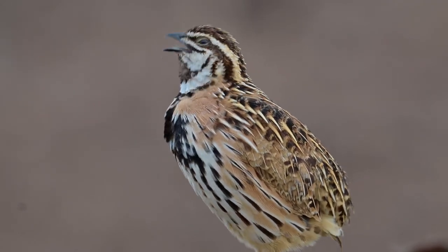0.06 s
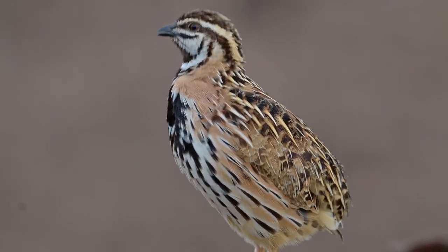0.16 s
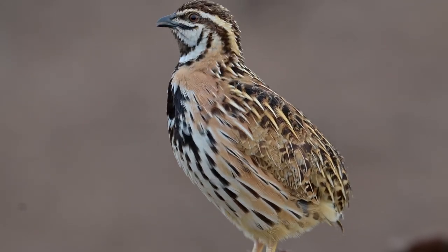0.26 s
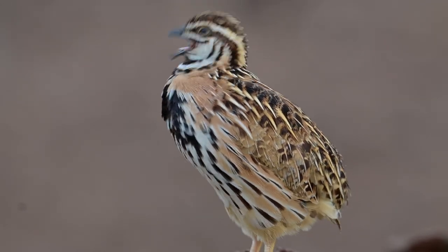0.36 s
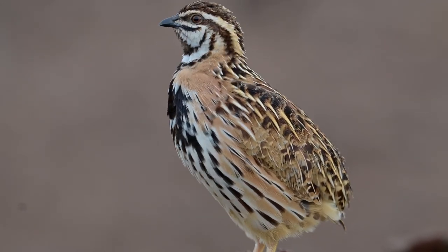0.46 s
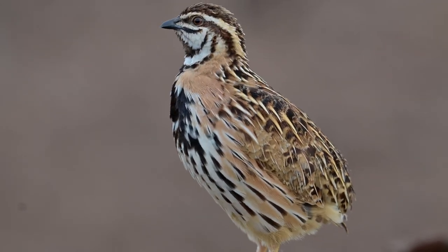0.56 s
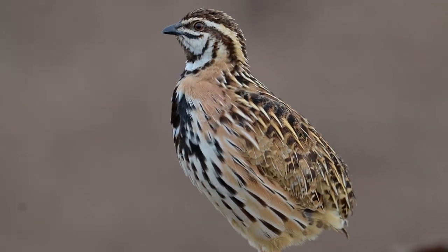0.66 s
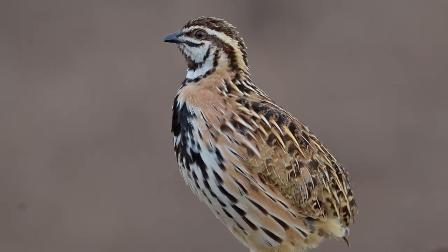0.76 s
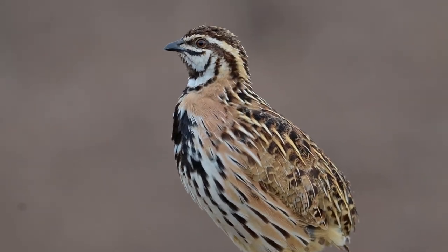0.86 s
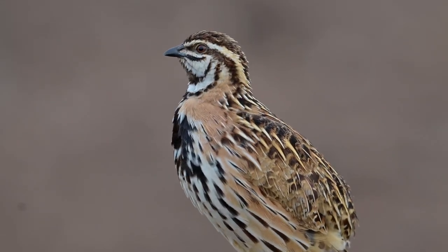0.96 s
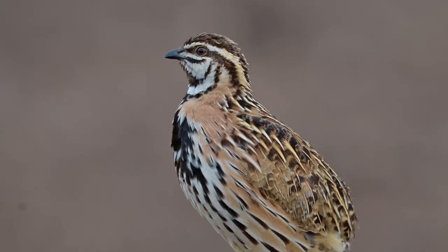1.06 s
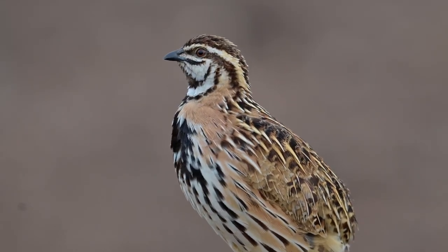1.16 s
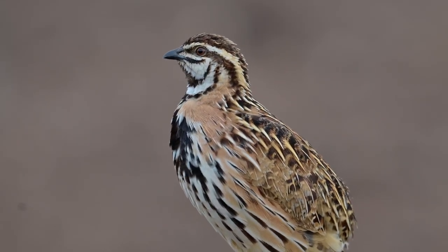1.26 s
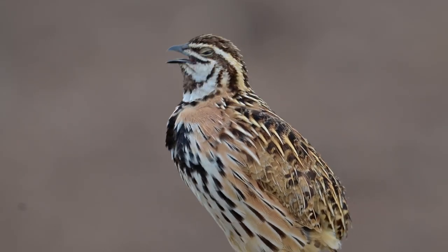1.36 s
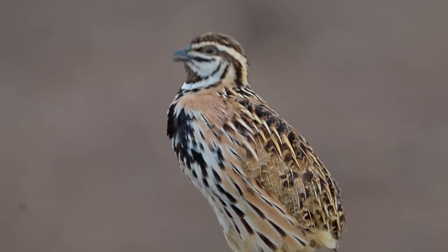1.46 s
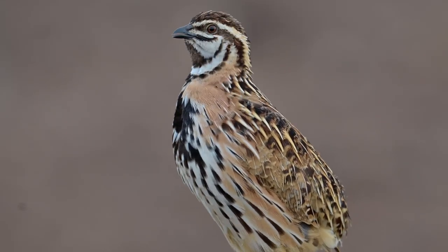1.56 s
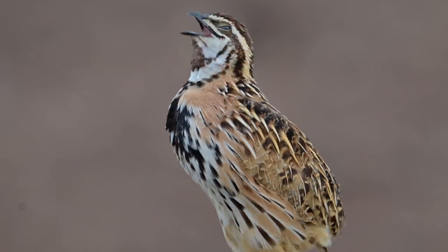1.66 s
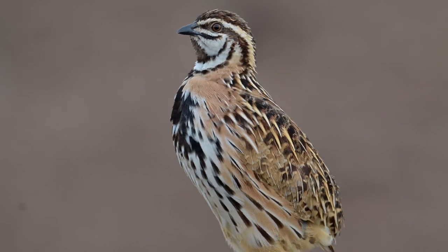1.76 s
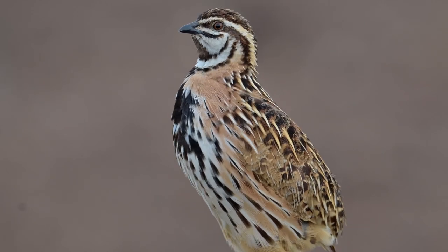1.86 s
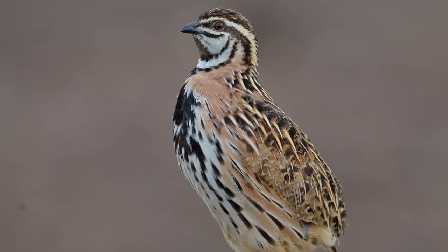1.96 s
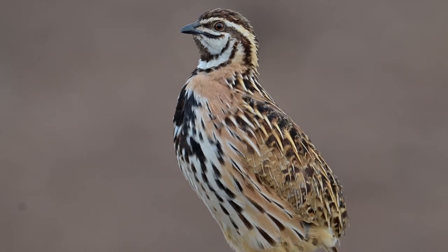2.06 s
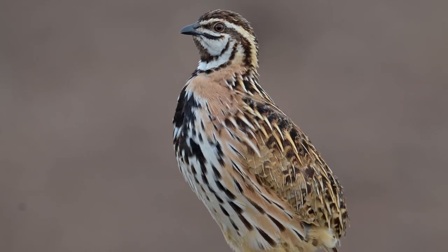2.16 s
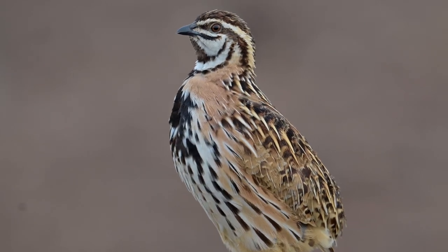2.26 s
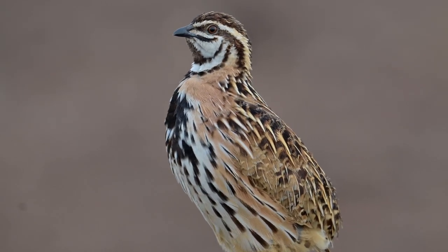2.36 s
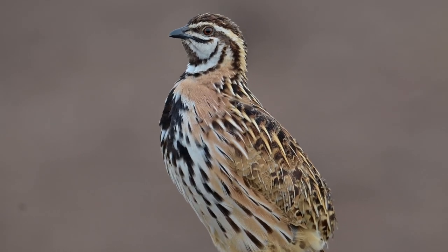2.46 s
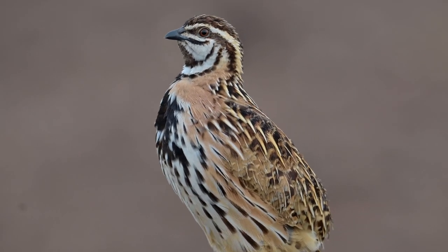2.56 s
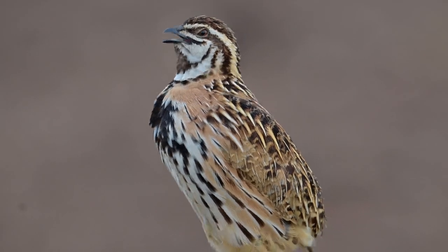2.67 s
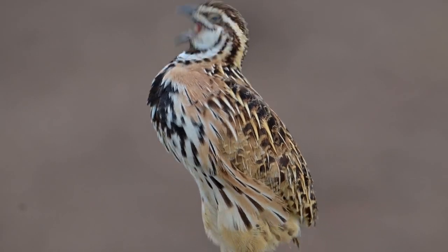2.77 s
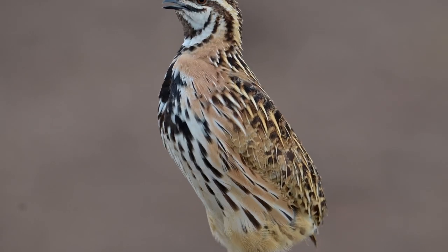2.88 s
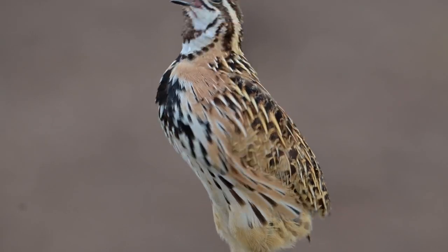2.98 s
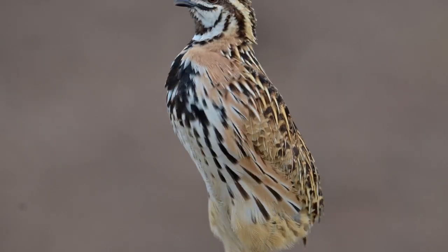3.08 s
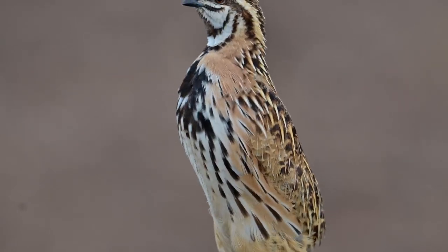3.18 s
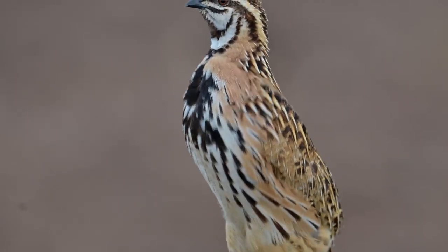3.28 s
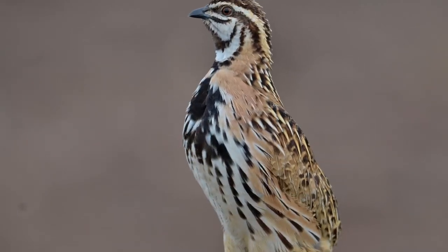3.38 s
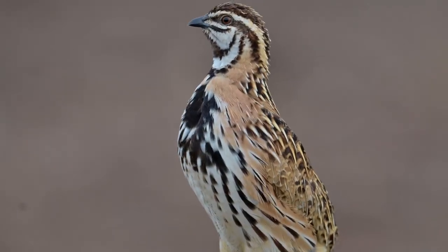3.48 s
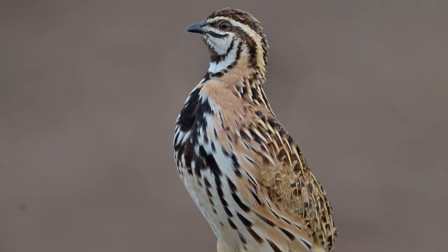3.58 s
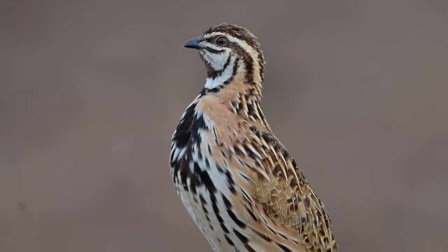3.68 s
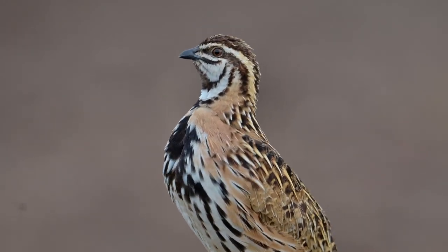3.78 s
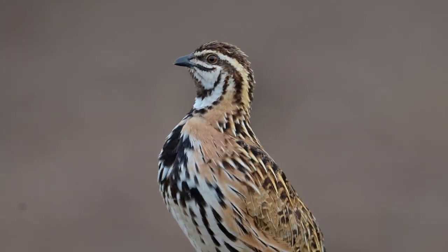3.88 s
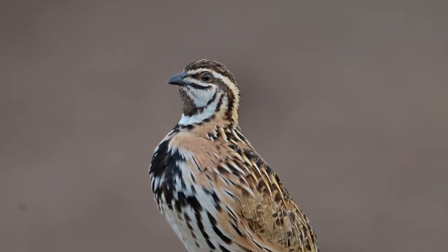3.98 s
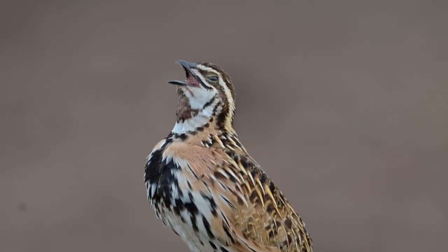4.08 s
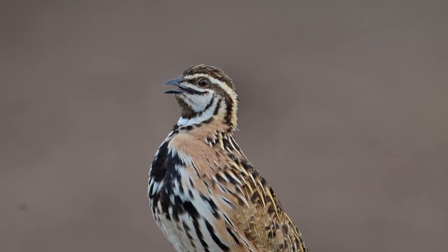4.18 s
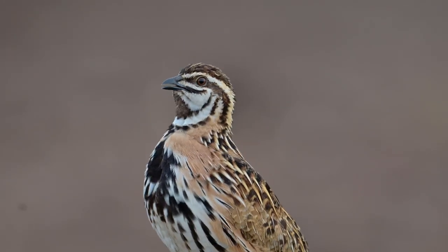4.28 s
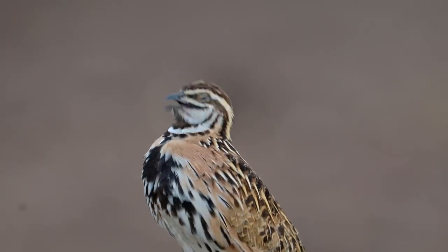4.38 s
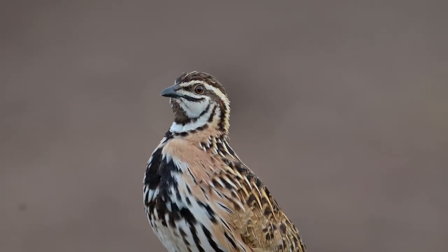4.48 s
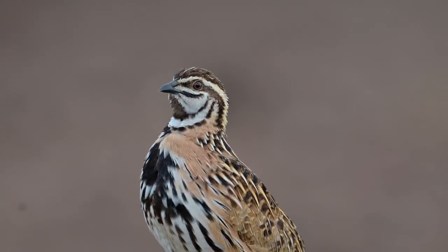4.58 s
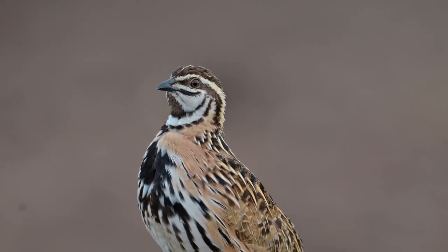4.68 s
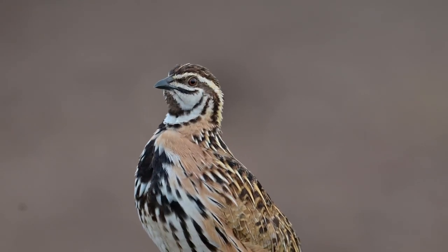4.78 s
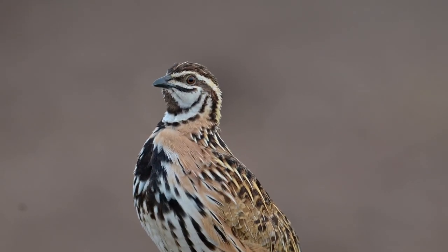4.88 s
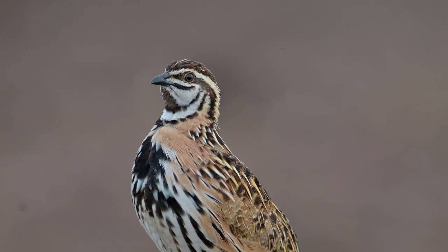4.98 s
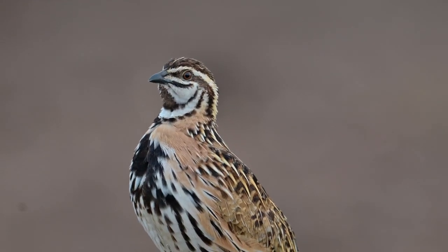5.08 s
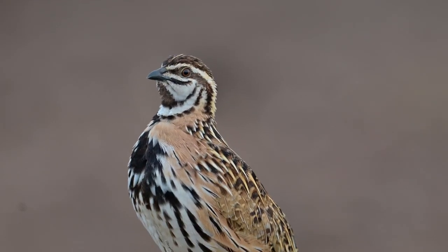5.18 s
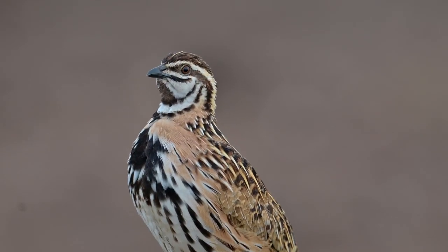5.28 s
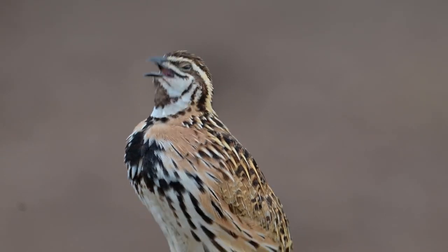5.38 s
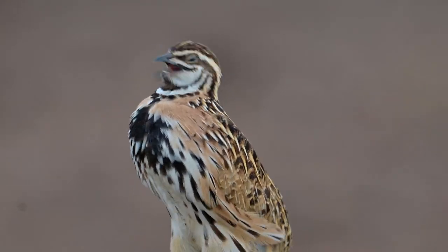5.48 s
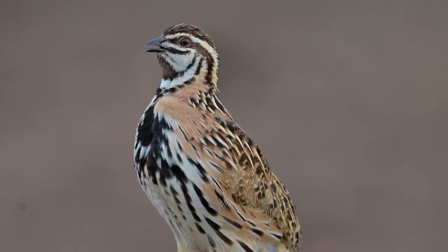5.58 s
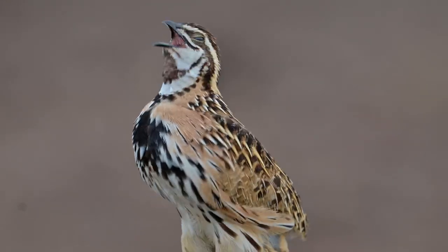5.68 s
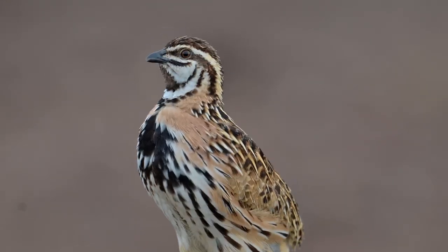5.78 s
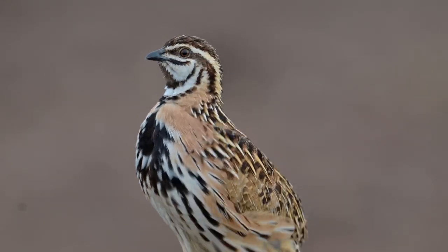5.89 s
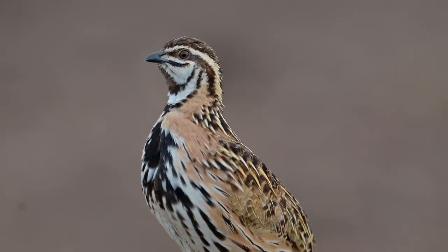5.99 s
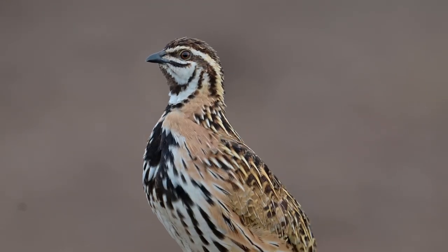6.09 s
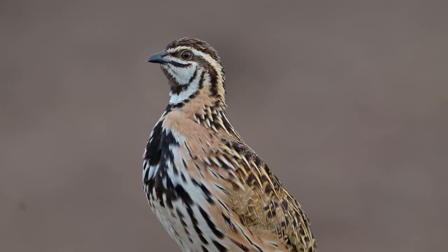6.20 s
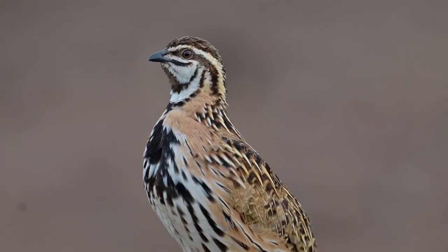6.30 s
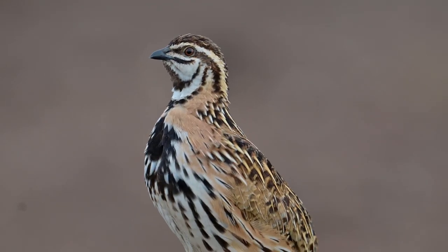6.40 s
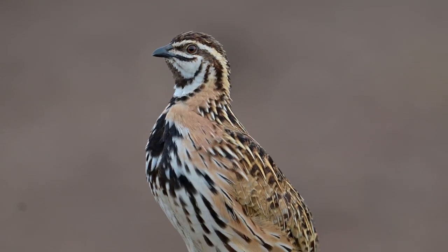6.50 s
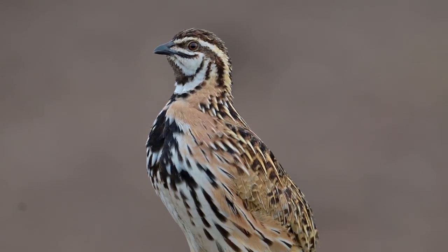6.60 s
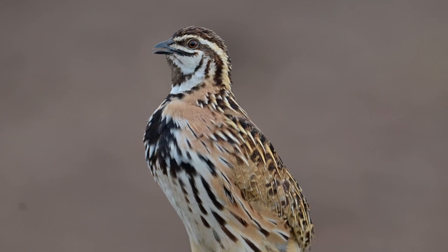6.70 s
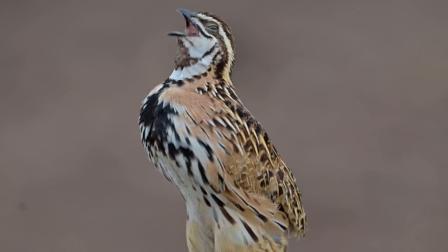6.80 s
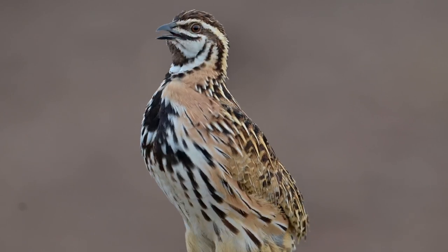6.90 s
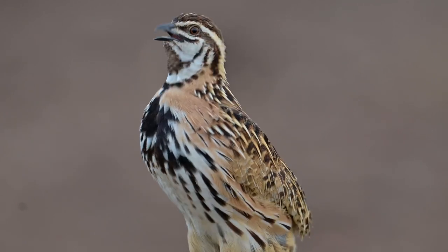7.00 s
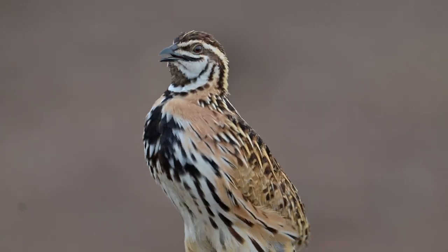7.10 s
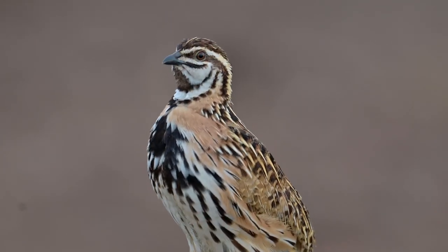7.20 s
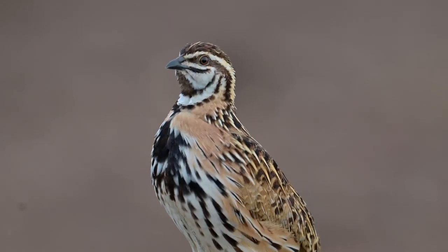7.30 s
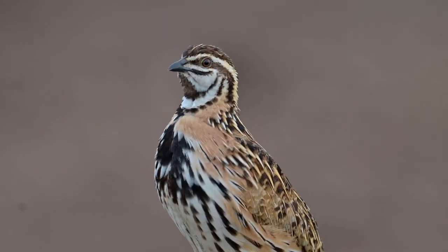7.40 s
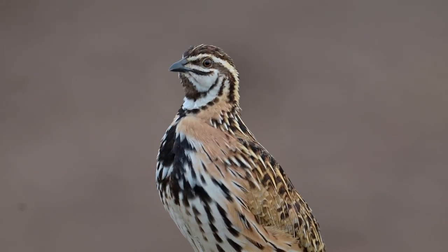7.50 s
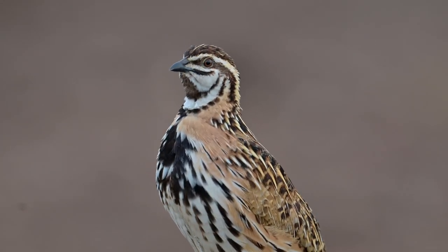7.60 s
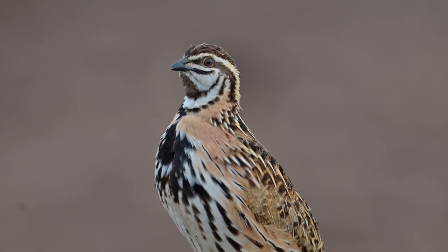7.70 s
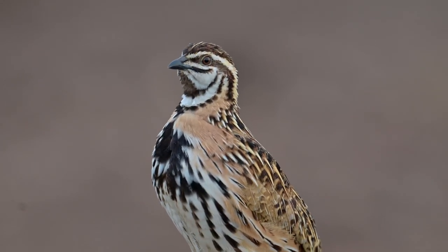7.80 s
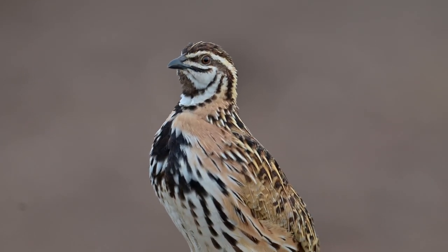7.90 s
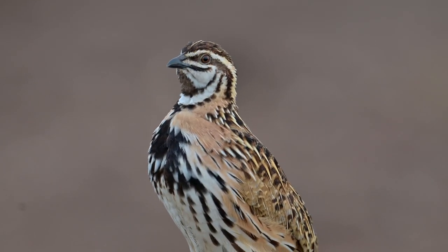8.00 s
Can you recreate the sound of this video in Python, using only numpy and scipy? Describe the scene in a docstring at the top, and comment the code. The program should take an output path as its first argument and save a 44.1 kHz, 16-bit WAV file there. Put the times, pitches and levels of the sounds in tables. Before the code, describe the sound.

Outdoor wildlife scene: a near quail repeats bright, pure two-note whistles about every 1.35 seconds, first moderate, then very loud. Following the first four calls, a distant quail replies softly to the right. A camera beside the microphone clatters in bursts of about six frames a second, dry clicks with short motor whirs. Behind it all are tiny bird chips, faint whistles, pulsing crickets and quiet airy rumble, with little reverberation.

```python
"""Quail calls and a camera on open ground

A quail whistles its two-note call six times, and a second one answers from far off to the right: bent sines
with weak overtones. Close by on the right a still camera fires bursts of frames: noise rattles, ringing body
modes and a motor's whir. Small birds (short gliding sines), two crickets (pulsed tones) and other insects
(noise bands) sound faintly over the low rumble of the air, which is shaped noise."""
import sys
import numpy as np
from scipy import signal
from scipy.fft import rfft, irfft, next_fast_len
from scipy.io import wavfile
from scipy.ndimage import uniform_filter1d, map_coordinates

SR = 44100
rng = np.random.default_rng(int(sys.argv[2]) if len(sys.argv) > 2 else 0)


def transcribe(u):
    """Save the signal u as a 16-bit wav file named by the first command-line argument.

    u: samples, shape (n,) or (channels, n), limited to [-1, 1]; the rate is SR.
    q: integer samples, one column per channel.
    """
    v = np.clip(np.atleast_2d(u).T, -1, 1)
    q = np.round(v * 32767).astype(np.int16)
    wavfile.write(sys.argv[1], SR, q)


N = 354991


def amp(db):
    """Decibels to a linear gain."""
    return 10 ** (np.asarray(db) / 20)


def unit(x):
    """Scale to an RMS of one."""
    return x / np.sqrt(np.mean(x ** 2) + 1e-20)


def along(points, hz):
    """Read a curve of (Hz, value) points on a log frequency axis."""
    f, v = np.transpose(points)
    return np.interp(np.log(hz + 1), np.log(f + 1), v)


def filtered(x, response):
    """Filter x by a complex response, given as a function of frequency in Hz."""
    n = x.shape[-1]
    m = next_fast_len(n + 4096)
    spectrum = rfft(x, m) * response(np.fft.rfftfreq(m, 1 / SR))
    return irfft(spectrum, m)[..., :n]


def wobble(rate):
    """A smooth random curve, rate knots a second."""
    knots = rng.standard_normal(int(N * rate / SR) + 4)
    return map_coordinates(knots, [np.arange(N) * rate / SR])


def add(track, s, sound):
    """Mix a sound in from time s on, cut to the track's ends."""
    i = round(s * SR)
    sound = sound[..., max(-i, 0):max(N - i, 0)]
    track[..., max(i, 0):max(i, 0) + sound.shape[-1]] += sound


def sides(db):
    """Gains for left and right, the left db above the right."""
    return amp(np.array([[.5], [-.5]]) * db)


def pair(n, alike):
    """Left and right noise whose likeness depends on frequency, mixed from a shared and an opposed part."""
    def shares(hz):
        turn = np.arccos(np.clip(along(alike, hz), -1, 1)) / 2
        return np.array([np.cos(turn), np.sin(turn)])

    mid, side = filtered(rng.standard_normal((2, n)), shares)
    return np.array([mid + side, mid - side])


def scatter(x, db):
    """The sound plus its short diffuse return from the ground: noise that decays at its own rate per pitch."""
    # Scatter from grass and stones. Each row: frequency in Hz, time to fall 60 dB in seconds.
    ground = [(3000, 0.04), (5000, .11), (8000, 0.022)]
    hz, t, z = signal.stft(rng.standard_normal((2, SR // 4)), SR, nperseg=128)
    decay = amp(-60 * t / along(ground, hz)[:, None])
    tail = signal.istft(z * decay, SR, nperseg=128)[1]
    tail = tail / np.linalg.norm(tail, axis=1, keepdims=True)
    tail = np.pad(tail, ((0, 0), (60, 0)))  # the return comes 60 samples late
    wet = signal.fftconvolve(x, tail, axes=1)
    return amp(db) * wet + np.pad(x, ((0, 0), (0, wet.shape[1] - x.shape[1])))


def glide(length, hz, db):
    """A short sine whose pitch bends through three points under a rounded swell."""
    u = np.linspace(0, 1, round(length * SR))
    pitch = np.polyval(np.polyfit([0, .5, 1], hz, deg=2), u)
    swell = np.sqrt(np.abs(np.sin(np.pi * u)))
    return amp(db) * swell * np.sin(2 * np.pi * np.cumsum(pitch) / SR)


def air():
    """Shaped noise for the open air's rumble and hiss; noise bands for far insect choruses and drones."""
    # Colour of the air. Each row: frequency in Hz, relative level in dB.
    air_colour = [(35, -34.5), (60, -3), (334, -8), (422, -11.5), (1210, -19), (1570, -24), (5220, -24),
                  (5870, -26.5), (8960, -34.5), (9840, -37), (15000, -30), (16500, -44.5)]
    # Width of the air. Each row: frequency in Hz, left-right likeness from 0 to 1.
    air_alike = [(40, 0.93), (130, 0.84), (400, .3), (3000, .15), (15000, 0)]
    # Far choruses and drones. Each row: centre in Hz, width in Hz, level in dB.
    bands = [(7700, 1300, -70.5), (40.4, 12, -59), (93, 30, -62.5), (8950, 400, -73), (3200, 1900, -65.5),
             (1204, 140, -68.5), (349, 41, -63), (287.7, 10, -65.5)]
    gust_db = 1.2  # slow swings of the air
    hiss = unit(filtered(pair(N, air_alike), lambda f: amp(along(air_colour, f))))
    floor = amp(-54.0 + gust_db * wobble(2.4)) * hiss
    for centre, width, db in bands:
        band = unit(filtered(pair(N, air_alike), lambda f: np.exp(-2 * ((f - centre) / width) ** 2)))
        # bands from 1 to 8 kHz come and go, the others hold steady
        swell_db = 3.5 * wobble(4) * (1000 < centre < 8000)
        floor = floor + amp(db + swell_db) * band
    return floor


def chatter(count):
    """Many distant birds: short random glides, blurred by the distance."""
    blend = np.zeros((2, N))
    for u, v in zip(rng.random((count, 3)), rng.standard_normal((count, 4))):
        hz = (2400 + 1600 * u[1]) * (1 + .06 * np.cumsum(v[:3]))
        length = .015 + .035 * u[2]
        add(blend, u[0] * N / SR, glide(length, hz, -68 + 3 * v[3]) * sides(3 * v[0]))
    return scatter(blend, -2)[:, :N]


def cricket():
    """Wing strokes about thirty a second, each a slightly rough tone that sags in pitch."""
    # The two crickets. Each row: pitch in Hz, typical level in dB, chirps as (start, end) in seconds.
    crickets = [(5260, -55, [(.19, .255), (.44, .55), (.895, .965), (1.15, 1.25), (2.18, 2.25),
                (2.45, 2.545), (3.775, 3.87), (4.04, 4.1), (5.385, 5.445), (6.74, 6.81), (7.305, 7.4),
                (7.555, 7.66), (7.805, 7.905)]), (5500, -61.5, [(-.01, .05), (.255, .35), (1.12, 1.15),
                (2.54, 2.6), (3.825, 3.95), (5.25, 5.38), (5.595, 5.695), (7.52, 7.555), (7.91, 7.945)])]
    strokes_hz = 29.5
    out = np.zeros((2, N))
    for hz, db, chirps in crickets:
        for start, end in chirps:
            t = np.arange(0, end - start, 1 / SR)
            cycle = 2 * np.pi * strokes_hz * t
            strokes = np.clip(.6 - np.cos(cycle), 0, 1)
            rough = 1 + .4 * unit(uniform_filter1d(rng.standard_normal(len(t)), size=90))
            tone = np.sin(2 * np.pi * hz * t - 1.8 * np.cos(cycle))
            chirp = amp(rng.normal(db, 1.2)) * strokes * rough * tone
            add(out, start, scatter(chirp * sides(2), -8.5))
    return out


def songbirds():
    """Chips and whistles as bent sines, and a note with wavering pitch, from birds further off."""
    # A small bird's chips. Each row: start in seconds, level in dB.
    chips = [(0.541, -49), (1.3087, -45), (2.0967, -42), (3.7011, -41.5), (5.2714, -38.5), (6.755, -42.5),
             (7.4986, -46)]
    # Parts of a chip. Each row: lag in seconds, length in seconds, start, middle and end pitch in Hz,
    # level in dB on top of the chip's own.
    chip_parts = [(0, 0.0011, 8280, 6600, 4800, 7.5), (.004, 0.0034, 7730, 7580, 6460, 7.5),
                  (0.018, .006, 2900, 3300, 3800, -3), (0.021, 0.0062, 5050, 4180, 3980, 4)]
    # Faint whistles. Each row: start in seconds, length in seconds, start, middle and end pitch in Hz,
    # level in dB.
    whistles = [(0.158, 0.048, 3060, 2990, 3410, -50.5), (0.882, 0.062, 3370, 3700, 3560, -51),
                (0.98, 0.057, 4020, 4250, 5600, -51), (1.362, 0.12, 3370, 2980, 3080, -46),
                (2.328, .022, 2700, 2680, 2780, -51), (2.433, 0.025, 3200, 3140, 3160, -50),
                (2.467, .035, 2640, 2820, 2650, -55), (2.6, .048, 2960, 3650, 5360, -52.5),
                (3.63, 0.051, 4340, 3910, 3840, -46), (3.764, .076, 5450, 5820, 3840, -59.5),
                (3.96, .03, 3000, 5700, 3050, -58), (6.648, 0.024, 3980, 5290, 4070, -49),
                (7.638, 0.035, 3900, 3630, 3680, -52), (7.668, 0.034, 4420, 4770, 3920, -51.5),
                (7.712, 0.026, 3200, 3880, 4830, -54), (7.748, 0.035, 6030, 5400, 4650, -51.5),
                (7.96, .035, 2920, 3870, 5840, -63)]
    # The wavering note. Each row: start in seconds, end in seconds, level in dB.
    trills = [(5.249, 5.718, -55.5), (6.874, 7.012, -57), (7.311, 7.387, -57)]
    trill_hz, waver_hz, wavers_per_s = 3060, 290, 58  # centre, swing either way, rate
    out = np.zeros((2, N))
    for s, db in chips:
        chip = np.zeros((2, SR // 20))
        for lag, length, *hz, part_db in chip_parts:
            add(chip, lag, glide(length, hz, db + part_db) * sides(1.5))
        add(out, s, scatter(chip, -8.5))
    for s, length, *hz, db in whistles:
        add(out, s, scatter(glide(length, hz, db) * sides(rng.normal(0, 2)), -6.5))
    for start, end, db in trills:
        t = np.arange(0, end - start, 1 / SR)
        waver = np.sin(2 * np.pi * wavers_per_s * t + 1.8 * wobble(30)[:len(t)])
        phase = 2 * np.pi * np.cumsum(trill_hz + waver_hz * waver) / SR
        note = amp(db) * signal.windows.tukey(len(t), .2) * np.sin(phase)
        add(out, start, scatter(note * sides(0.83), -6))
    return out


def camera():
    """Each frame: mirror and shutter blows rattle as noise and ring the body's modes while the motor whirs."""
    # Bursts of frames. Each row: first mirror slap in seconds, last mirror slap in seconds.
    bursts = [(.6334, .794), (1.4919, 1.9736), (2.9129, 3.5565), (4.3025, 5.1071), (5.8628, 6.506),
              (7.0647, 7.2252), (8.096, 8.096)]
    # Blows inside one frame. Each row: seconds from the slap, rattle level in dB, rattle's time to fall
    # 60 dB in seconds, tilt in dB per octave, ring level in dB.
    blows = [(-.0575, -16.5, .014, 0, -54.5), (-.047, -25.5, .03, -8.5, -38), (-.023, -20, .06, 0.5, -53.5),
             (.0005, -4, .02, .5, -24), (.0025, -4, .02, 1.5, -20.5), (.007, -5, 0.037, -2, -34.5),
             (.012, -19.5, .03, 3, -64), (0.054, -31.5, .025, 3.5, -57.5), (.0605, -41, 0.017, 1.5, -37.5),
             (.069, -27, .025, -5, -47.5)]
    # Body modes. Each row: frequency in Hz, typical level in dB, time to fall 60 dB in seconds.
    case_modes = [(552, -10.5, 0.03), (974, -23, 0.37), (1120.7, 0.5, 0.051), (1586, -13, 0.069),
                  (1895, -2, 0.067), (2338, -5.5, 0.098), (4003, -3, 0.025), (4557, 6.5, 0.015)]
    # Colour of the rattles. Each row: frequency in Hz, level in dB.
    clack = [(180, -33), (300, -20.5), (1070, -11.5), (2930, -2), (4610, -3), (6560, -6.5), (12400, -12.5),
             (15700, -18), (16500, -35.5)]
    # Colour of the motor. Each row: frequency in Hz, relative level in dB.
    whir_colour = [(180, -31.5), (440, -13), (500, -7.5), (1090, -5.5), (1660, -2.5), (1810, 2.5),
                   (1990, -5), (3530, -1), (5100, -4), (6780, -7), (10500, -13.5), (15200, -21),
                   (16500, -42.5)]
    # Place of the camera. Each row: frequency in Hz, left minus right in dB.
    camera_side = [(60, -2.5), (150, -11), (380, -2), (950, -2.5), (2380, 1.5), (5980, -2.5), (15000, -4.5)]
    # Width of the noises. Each row: frequency in Hz, left-right likeness from 0 to 1.
    camera_alike = [(500, 0.98), (3000, 0.54), (8000, 0.11), (15000, 0.28)]
    # Phase between the sides. Each row: frequency in Hz, lead of the left in radians (below 0 it lags).
    camera_lead = [(0, -0.5), (1100, -0.74), (3620, -3), (5170, -7.5), (7920, -29.5), (11500, -28),
                   (16400, -42)]
    frame_s = .1608
    drive_db, on_s, off_s = -34.5, -0.059, 0.072  # the motor's level, start and stop, timed from the slap
    spin_up_s, run_down_db_per_s = 0.0098, 679
    jolt_db, jolt_s, jolt_width_s = 5.5, 0.012, 0.013  # the slap shakes the gears

    drive, rattles, rings = np.zeros((2, N)), np.zeros((2, N)), np.zeros(N)
    t = np.arange(on_s, on_s + frame_s, 1 / SR)
    jolt = jolt_db * np.exp(-((t - jolt_s) / jolt_width_s) ** 2)
    run_db = drive_db + jolt - run_down_db_per_s * np.maximum(t - off_s, 0)
    motor = np.clip((t - on_s) / spin_up_s, 0, 1) ** 2 * amp(run_db)

    short = np.arange(SR // 10) / SR
    rise = 1 - np.exp(-short / 0.0015)
    half = len(short) // 2  # a rattle lasts half as long as a ring
    for first, last in bursts:
        for s in np.linspace(first, last, round((last - first) / frame_s) + 1):
            add(drive, s + t[0], motor)
            for lag, db, t60, tilt_db, ring_db in blows:
                decay = (rise * amp(-60 * short / t60))[:half]
                rattle = pair(half, camera_alike) * decay
                rattle = filtered(rattle, lambda f: amp(tilt_db * np.log2((f + 50) / 3000)))
                add(rattles, s + lag, amp(db) * rattle)
                ring = np.zeros(len(short))
                for hz, level, mode_t60 in case_modes:
                    # the same parts strike each time, so the modes vary little
                    fall_db = level + rng.normal(0, 1.2) - 60 * short / mode_t60
                    ring += amp(fall_db) * np.sin(2 * np.pi * hz * short)
                add(rings, s + lag, amp(ring_db) * rise * ring)

    teeth = amp(1.7 * wobble(500))  # gear teeth catch unevenly
    noise = unit(filtered(pair(N, camera_alike), lambda f: amp(along(whir_colour, f))))
    whir = drive * teeth * noise
    both = whir + rings + filtered(rattles, lambda f: amp(along(clack, f)))

    def placing(f):
        lead = np.interp(f, *np.transpose(camera_lead)) * np.array([[.5], [-.5]])
        return sides(along(camera_side, f)) * np.exp(1j * lead)

    return filtered(both, placing)


def quail(notes, wet_db, lead, dull_db, pans_db, full_db):
    """A clear whistle with weak overtones: each note drops in, climbs, swells and ends in a rising flick.

    The left leads by lead radians; dull_db per octave above 3400 Hz dulls the flick; pans_db is left minus
    right for the long and the short note; notes under full_db swell more steeply."""
    # The flick that ends both notes. Each row: time in seconds, pitch in Hz, relative level in dB.
    flick = [(-.007, 3750, 1), (-.0035, 4330, -4), (0, 5200, -13.5), (.003, 6260, -7), (.007, 6500, -13.5),
             (.012, 6900, -17), (.017, 7650, -22.5), (.021, 7700, -55)]
    # The long, then the short note. Each row: start pitch in Hz, lowest point in seconds before the flick
    # (at most 0.8 of the length), even climb from there in Hz, start level in dB, build-up in seconds.
    note_shapes = [(3500, 0.045, 140, -13, 0.0073), (3300, 0.076, 270, -14, 0.015)]
    # Overtones. Each row: multiple of the pitch, level in dB before it fades and wavers.
    overtones = [(2, -31.5), (3, -50.5)]
    drop_in_hz, drop_in_s, bend = 910, .0025, 3.6  # a note drops in from above; how late its climb steepens
    swell_db_per_s, soft_swell = 33, 4.4  # at full voice; dB/s more for each dB under it
    onset_s = .0042  # first rise
    fade_db, flutter_db = 20, 3.5  # in the flick: overtones lost, flutter of the voice

    out, flutter = np.zeros((2, N)), wobble(700)
    at, hz, fade = np.transpose(flick)
    for k, (s, length, low_hz, db) in enumerate(notes):
        start_hz, turn, climb_hz, start_db, build = note_shapes[k % 2]
        turn = min(turn, 0.8 * length)
        t = np.arange(-length, at[-1], 1 / SR)
        age = t + length

        u = np.clip((t + turn) / (turn + at[0]), 0, 1)  # progress from the lowest point to the flick
        fall = np.interp(t, [-length, -turn], [start_hz, low_hz])
        climb = climb_hz * u + (hz[0] - low_hz - climb_hz) * u ** bend
        jump = np.interp(t, at, hz) - hz[0]
        pitch = uniform_filter1d(fall + climb + jump, size=66)
        pitch = pitch + drop_in_hz * np.exp(-age / drop_in_s)

        swell = swell_db_per_s + soft_swell * max(full_db - db, 0)
        level = db + start_db * np.exp(-age / build) + swell * np.minimum(t + 0.0033, 0)
        level = level + np.interp(t, [-.012, *at], [0, *fade])

        waver = wobble(92)[:len(t)]  # the overtones are less steady than the note
        phase = 2 * np.pi * np.cumsum(pitch) / SR + np.array([[lead], [0]])
        high = np.clip((pitch - 3750) / 900, 0, 1)  # in the flick the overtones fade and the voice breaks up
        tone = np.sin(phase)
        for m, over_db in overtones:
            over = amp(over_db - fade_db * high + 2.1 * waver) * np.sin(m * phase)
            tone = tone + over * (m * pitch < SR / 2)
        breakup = flutter_db * high * flutter[round((s - length) * SR):][:len(t)]
        tone = tone * amp(breakup + dull_db * np.log2(pitch / 3400))

        onset = np.tanh(age / onset_s) ** 2
        note = np.sqrt(2) * onset * amp(level) * tone * sides(pans_db[k % 2])
        add(out, s - length, scatter(note, wet_db))
    return out


def scene():
    """The air, insects and small birds, then the camera and the two quails, summed."""
    # The near quail, long and short notes in turn. Each row: flick in seconds, length before it in seconds,
    # lowest pitch in Hz, level in dB.
    near_notes = [(.152, .097, 3260, -17), (.396, 0.062, 3140, -11.5), (1.485, .095, 3260, -11),
                  (1.724, 0.063, 3142, -6), (2.821, 0.092, 3296, -5), (3.062, .06, 3190, -3.5),
                  (4.165, 0.091, 3328, -4.5), (4.408, 0.062, 3198, -2.5), (5.510, 0.092, 3342, -5.5),
                  (5.753, 0.062, 3246, -1), (6.864, 0.092, 3350, -5.5), (7.107, 0.061, 3233, -2)]
    # The far quail. Each row: the same columns, flick and length in seconds, pitch in Hz, level in dB.
    far_notes = [(.722, 0.052, 3300, -40), (.978, 0.052, 3206, -36), (2.0, 0.06, 3250, -32.5),
                 (2.256, 0.055, 3174, -31), (3.301, 0.081, 3250, -31), (3.555, .052, 3220, -28.5),
                 (4.605, 0.071, 3296, -31.5), (4.86, 0.059, 3180, -30)]
    background = air() + chatter(count=220) + cricket() + songbirds()
    far = quail(far_notes, wet_db=-6, lead=-1.1, dull_db=-10, pans_db=(-3, -5.5), full_db=-17.0)
    near = quail(near_notes, wet_db=-13, lead=0.68, dull_db=-1.0, pans_db=(3, 1.4), full_db=5.0)
    return background + camera() + far + near


def record(dry):
    """A limiter grips loud sounds within milliseconds and lets go slowly, sparing the bass; the top is cut."""
    limit_db, grip_s, let_go_db_per_s = -7.5, .006, 79
    spared_hz, top_hz = 400, 16800
    envelope = np.abs(signal.hilbert(dry, next_fast_len(N))[:, :N]).max(axis=0)
    loud_db = 20 * np.log10(envelope + 1e-9)
    over_db = np.maximum(uniform_filter1d(loud_db, size=88) - limit_db, 0)
    # the cut jumps up with each peak and falls back at a fixed rate
    release_db = let_go_db_per_s * np.arange(N) / SR
    cut_db = np.maximum.accumulate(over_db + release_db) - release_db
    keep = np.exp(-1 / (grip_s * SR))
    smooth_cut_db = signal.lfilter([1 - keep], [1, -keep], cut_db)
    bass = filtered(dry, lambda hz: 1 / (1 + (hz / spared_hz) ** 4))
    held = bass + (dry - bass) * amp(-smooth_cut_db)
    # 8 dB down from 16 kHz, nothing from top_hz up
    return filtered(held, lambda hz: (hz < top_hz) * amp(-8 * np.clip((hz - 15700) / 300, 0, 1)))


dry = scene()
out = record(dry)
transcribe(out)
```